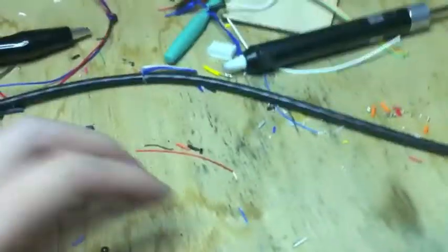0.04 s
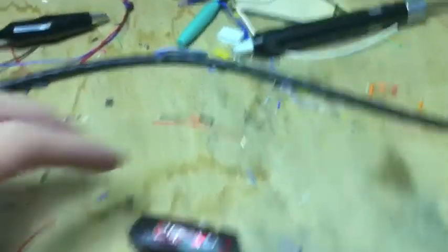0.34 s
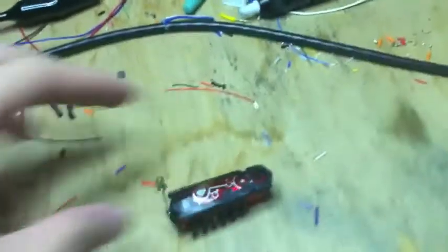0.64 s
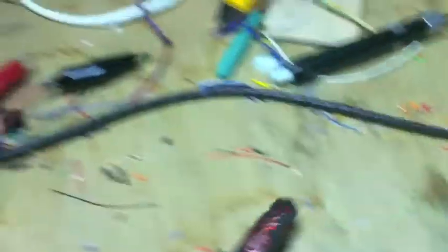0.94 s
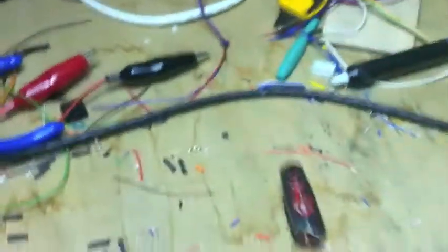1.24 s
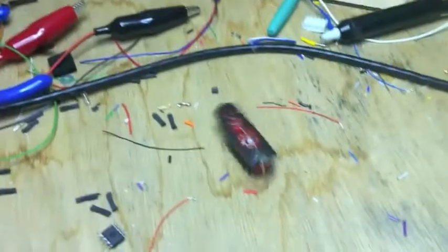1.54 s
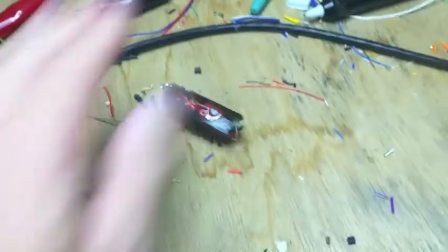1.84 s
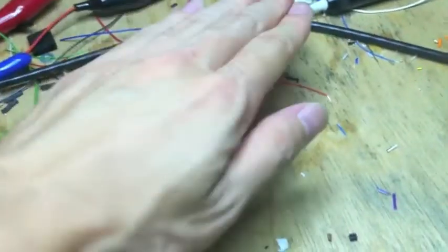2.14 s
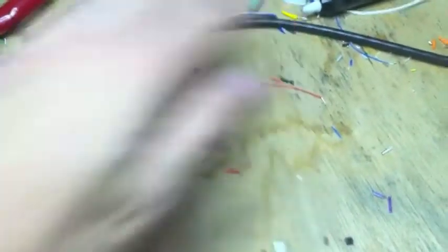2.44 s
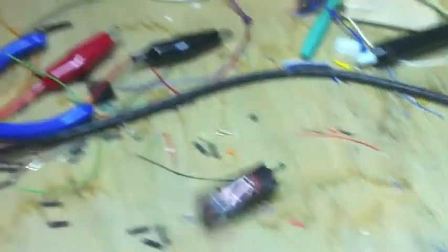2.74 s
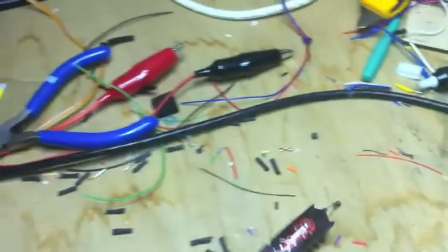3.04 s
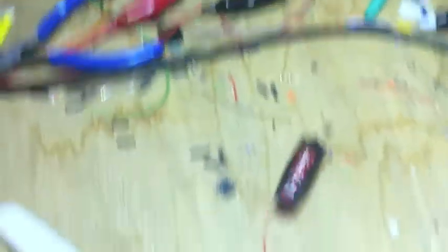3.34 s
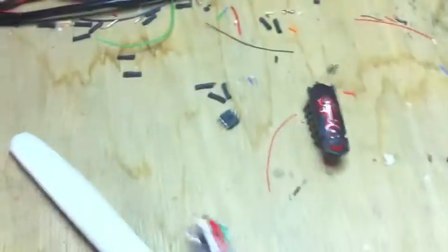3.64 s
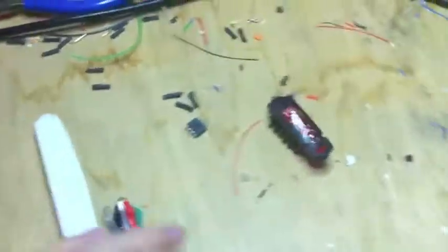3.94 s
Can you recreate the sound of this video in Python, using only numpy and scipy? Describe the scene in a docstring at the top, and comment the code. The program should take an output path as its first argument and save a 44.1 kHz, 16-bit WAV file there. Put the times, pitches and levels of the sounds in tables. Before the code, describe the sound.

A small vibrating toy bug skitters over a wooden workbench in quick, uneven plastic taps with a faint motor hum. It stops briefly, starts again, and a close scrape with knocks follows in a small, quiet room.

```python
"""Quick, uneven plastic taps skitter over a wooden workbench, above a faint hum and hiss.
It is a toy bug: a small unbalanced motor shakes it, so its shell keeps hitting the wood.
A hand holds it, lets go, covers it and lets go again. Near the end something is dragged
and knocked close by. The room is small and quiet."""
import sys
import numpy as np
from scipy import signal
from scipy.fft import rfft, irfft
from scipy.io import wavfile
from scipy.ndimage import uniform_filter1d

SR = 44100
rng = np.random.default_rng(int(sys.argv[2]) if len(sys.argv) > 2 else 0)


def store_wav(level_fs):
    """Save 16-bit WAV to argv[1]."""
    pcm = np.round(np.clip(np.atleast_2d(level_fs), -1, 1) * 32767)
    wavfile.write(sys.argv[1], SR, pcm.T.astype(np.int16))


N = 176400
T = np.arange(N) / SR
HIT_T = np.arange(int(.07 * SR)) / SR  # time within one hit, in seconds


def amp(db):
    """Turn decibels into a gain."""
    return 10 ** (np.asarray(db) / 20)


def unit(x):
    """Scale a signal to a typical size (rms) of 1."""
    return x / np.std(x)


def band(x, hz, kind="bandpass", order=2):
    """Keep the pitches between, above or below the given edges."""
    return signal.sosfilt(signal.butter(order, np.clip(hz, 10, SR * .45), kind, fs=SR, output="sos"), x)


def colour(x, points):
    """Shape the tone by (frequency [Hz], level [dB]) points; rms 1."""
    hz, db = np.array(points).T
    freqs = np.maximum(np.arange(N // 2 + 1) * SR / N, 1)
    gain = amp(np.interp(np.log(freqs), np.log(hz), db))
    return unit(irfft(rfft(x) * gain, N))


def curve(points):
    """A changing gain from (time [s], level [dB]) points."""
    return amp(np.interp(T, *np.array(points).T))


def wander(per_s):
    """A smooth random wobble with about per_s new values a second; rms 1."""
    hold = int(SR / per_s)
    steps = np.repeat(rng.standard_normal(N // hold + 1), hold)
    return unit(uniform_filter1d(uniform_filter1d(steps, hold), hold)[:N])


def add(out, at, sound):
    """Mix a sound in at a time in seconds."""
    start = int(np.clip(round(at * SR), 0, N - 1))
    out[start:start + len(sound)] += sound[:N - start]


def ring(modes, detune, scatter_db=3):
    """A struck object rings with a few dying tones, a little different on each blow."""
    hz, db, fade_s = np.array(modes).T
    chance = rng.standard_normal((2, len(hz)))
    db, hz = db + scatter_db * chance[0], hz * (1 + detune * chance[1])
    fades = np.exp(-np.log(1000) * HIT_T / fade_s[:, None])
    return amp(db) @ (np.sin(2 * np.pi * hz[:, None] * HIT_T) * fades)


def room_noise():
    """The soft, low, steady rush of a quiet room."""
    # tone of the rush (frequency [Hz], level [dB])
    tone = [(45, -27), (105, 0), (190, 3.5), (400, -10), (700, -17), (3000, -21.5), (15500, -25.5)]
    return amp(-65.5) * colour(rng.standard_normal(N), tone)


def clack(at, hardness):
    """One tap sets off the shell's broad resonances at once; harder contact is brighter."""
    # pitches the shell favours on wood (frequency [Hz], width [Hz], level [dB])
    resonances = [(1640, 320, -4.5), (2120, 524, -0.5), (3366, 710, -12.5), (4060, 594, -9),
                  (6500, 6000, -24.5)]
    # the lowest one swells and fades as the toy crosses the bench (time [s], boost [dB])
    woodiness = [(.75, 5.5), (1.0, -2), (1.4, 2), (2.3, -6.5), (3.4, 5)]
    hz, width, db = np.array(resonances).T
    chance = rng.standard_normal((2, len(db)))
    db, hz = db + 2.0 * chance[0], hz * (1 + 0.029 * chance[1])
    db[0] += np.interp(at, *np.array(woodiness).T)
    size = len(HIT_T)
    freqs = np.maximum(np.fft.rfftfreq(size, 1 / SR), 1)
    peaks = amp(db) / (1 + (2 * (freqs[:, None] - hz) / width) ** 2)
    treble_octaves = np.clip(np.log2(freqs / 2000), 0, 2)
    gain = np.linalg.norm(peaks, axis=1) * amp(0.22 * hardness * treble_octaves)
    # turn this tone shape into a tap with its energy at the very start (minimum phase)
    cepstrum = 2 * irfft(np.log(gain), size)[:size // 2]
    tap = irfft(np.exp(rfft(cepstrum, size)), size)
    return unit(band(tap, 1190, "highpass", order=3))


def shell_taps(chatter_s=0.0063, bench_delay_s=0.00291, bench_detune=0.057):
    """Each hop makes the shell clack and chatter and nudges the bench, which also takes dull bumps."""
    # the shell landing (time [s], relative level [dB], hardness [higher is brighter])
    hops = [(0.021, -41, 1.5), (0.514, -52, -14), (0.5407, -45.5, -10), (0.6172, -59, -3),
            (0.644, -54, -20), (0.6737, -44, -8), (0.7006, -42, -18), (0.7307, -41.5, 13),
            (0.7593, -43.5, -4), (0.786, -57, -30), (0.8415, -49, -33), (0.877, -55, -28),
            (0.905, -42.5, -11), (0.927, -43, 2.5), (0.946, -44.5, -1), (0.967, -49.5, -7), (0.986, -47, 1),
            (1.002, -44.5, 1), (1.0204, -48.5, -10), (1.033, -45.5, -3), (1.0622, -45.5, -4),
            (1.0982, -49, -28), (1.1285, -42.5, 7.5), (1.166, -42.5, 15), (1.199, -47.5, 0),
            (1.2354, -53.5, 0), (1.2654, -51.5, -5), (1.3399, -45, -36), (1.366, -45, -11),
            (1.471, -41, 6.5), (1.4972, -43, -12), (1.519, -49.5, 7), (1.559, -44.5, -3), (1.6029, -42, 5),
            (1.6489, -47, 1), (1.72, -43, -6), (1.7774, -44.5, -4.5), (1.817, -46, -9), (1.851, -50.5, 4),
            (1.883, -42, -2), (1.921, -50.5, -3), (1.9686, -39.5, -1.5), (1.9953, -45.5, -12),
            (2.0042, -48, -9), (2.0287, -44, -12), (2.058, -40, 5.5), (2.114, -47, -19), (2.1796, -57, -36),
            (2.1949, -60, -31), (2.6593, -47.5, -16), (2.686, -43.5, 5.5), (2.722, -50, -6),
            (2.753, -46, 0), (2.7636, -51.5, -2), (2.7961, -44, -3.5), (2.833, -42.5, -1),
            (2.867, -36, -11), (2.8944, -48.5, -18), (2.924, -52.5, -49), (2.9685, -46, 0),
            (3.0023, -50, 6), (3.0286, -42.5, -2), (3.0898, -53.5, -13), (3.1267, -46, -5.5),
            (3.199, -49.5, -16), (3.231, -50, 0), (3.2442, -49.5, 6), (3.2696, -53, -7),
            (3.3056, -44.5, 2.5), (3.3157, -51, -17), (3.3766, -44.5, -20), (3.3943, -50, -15),
            (3.4083, -46.5, 0), (3.4298, -56, -1), (3.4453, -48, 2), (3.477, -49.5, -44),
            (3.5021, -46, 1.5), (3.5399, -49.5, -2), (3.564, -48, -18), (3.582, -46.5, 5.5),
            (3.6067, -46, 3), (3.6284, -48, -6), (3.6563, -46, -4), (3.6826, -44, 4), (3.9557, -47.5, 4),
            (3.9688, -48.5, -22)]
    # tones of the bench top (frequency [Hz], level [dB], time to fade by 60 dB [s])
    bench_modes = [(199, -6.5, 0.094), (299, -5, 0.044), (398.6, -1, 0.056), (960, -7.5, 0.013)]
    # dull bumps on the bench (time [s], level [dB])
    bumps = [(0.044, -46.5), (1.408, -46), (1.426, -47.5), (1.647, -48)]
    shell, chatter, bench = np.zeros((3, N))
    for at, db, hardness in hops:
        add(shell, at, amp(db - 9.5) * clack(at, hardness))
        puff = rng.standard_normal(len(HIT_T)) * np.exp(-(HIT_T / chatter_s) ** 2)
        add(chatter, at, amp(db - 4 + 0.63 * hardness) * puff)
        add(bench, at + bench_delay_s, amp(db - 13) * ring(bench_modes, bench_detune))
    for at, db in bumps:
        add(bench, at, amp(db) * ring(bench_modes, bench_detune))
    chatter = band(band(chatter, 3520, "highpass"), 10000, "lowpass", order=1)
    return shell + chatter + band(bench, 131, "highpass")


def knocks(click_decay_s=0.0066):
    """Handling makes hollow knocks: a short ring with a click on top."""
    # the knocks (time [s], ring level [dB], click level [dB])
    blows = [(0.0496, -45, -50), (0.071, -45.5, -50), (0.107, -50, -51.5), (2.862, -51, -45),
             (2.8647, -42, -32), (3.6366, -34, -51), (3.7211, -34, -28), (3.7241, -42, -31),
             (3.737, -35, -49), (3.7472, -29.5, -60), (3.8332, -37.5, -40), (3.8548, -37, -40.5),
             (3.9299, -39.5, -60)]
    # tones of a knock (frequency [Hz], level [dB], time to fade by 60 dB [s])
    knock_modes = [(1023, -9, 0.019), (1460, -3, 0.0066), (1560, 1.5, 0.013)]
    body, click = np.zeros((2, N))
    for at, body_db, click_db in blows:
        add(body, at, amp(body_db) * ring(knock_modes, detune=0.089))
        puff = rng.standard_normal(len(HIT_T)) * np.exp(-HIT_T / click_decay_s)
        add(click, at, amp(click_db) * puff)
    return band(body, 850, "highpass") + band(click, (1920, 5750), order=1)


def motor(spin_hz=188.3, ticks_per_s=110, fade_s=0.2):
    """The spinning weight hums, the brushes hiss, the legs tick and shake the bench."""
    # the toy running free (start [s], end [s], hum [dB], hiss [dB], rumble [dB], leg ticks [dB])
    runs = [(.5, 2.174, -67.5, -73, -64.8, -73.5), (2.66, 4.05, -66, -74, -67.5, -69)]
    # tone of the shaking bench (frequency [Hz], level [dB])
    rumble_tone = [(50, -14), (130, -8), (280, 5), (430, -1), (650, -12), (6000, -24)]
    phase = 2 * np.pi * np.cumsum(spin_hz * (1 + .04 * wander(22))) / SR
    hum = np.sin(phase) + amp(-7) * np.sin(2 * phase)
    hum = unit(hum * amp(3.1 * wander(14)))
    hiss = unit(band(rng.standard_normal(N), (7445, 7835), order=1) * amp(wander(9.82)))
    rumble = colour(rng.standard_normal(N), rumble_tone) * amp(2 * wander(13))
    steps = (rng.random(N) < ticks_per_s / SR) * amp(11 * rng.uniform(-1, 1, N))
    legs = unit(signal.fftconvolve(steps, clack(at=0, hardness=-21))[:N])
    out = np.zeros(N)
    for start, end, hum_db, hiss_db, rumble_db, legs_db in runs:
        # fades in as the hand lets go, out as it covers the toy
        free = np.clip(np.minimum(T - start, end - T) / fade_s + .5, 0, 1)
        layers = amp(hum_db) * hum + amp(hiss_db) * hiss + amp(rumble_db) * rumble + amp(legs_db) * legs
        out += free * layers
    return out


def rustle():
    """A faint scratchy rustle: high noise that flickers quickly."""
    # loudness of the rustle (time [s], level [dB])
    levels = [(2.6, -85.5), (3.27, -59.5), (3.5, -69.5), (4.0, -75)]
    scratches = rng.standard_normal(N) * wander(160) ** 2
    return unit(band(scratches, 2400, "highpass", order=1)) * curve(levels)


def dragging(slips_per_s=72, slip_decay_s=0.003):
    """Something sticks and slips in quick rough jerks, ending in a rising rub."""
    # loudness as the pressure changes (time [s], level [dB])
    levels = [(3.62, -90), (3.688, -61), (3.704, -40.5), (3.735, -41.5), (3.765, -50), (3.81, -50),
              (3.84, -44), (3.875, -52.5), (3.925, -48.5), (4.0, -73)]
    # tone of the scrape (frequency [Hz], level [dB])
    tone = [(60, -17), (170, -0.5), (370, 6.5), (750, 0), (1150, -4), (1590, 1.5), (2200, -4.5),
            (4600, -11), (15000, -20)]
    # start and end of the rub (time [s], pitch [Hz])
    glide = [(3.82, 428.7), (3.93, 977)]
    slip_count = np.cumsum(slips_per_s * (1 + 0.02 * wander(40))) / SR
    since_slip_s = (slip_count % 1) / slips_per_s
    friction = 0.43 + np.exp(-since_slip_s / slip_decay_s)
    jerks = amp(19.5) * np.diff(np.floor(slip_count), prepend=0)  # one spike per slip
    grit = rng.standard_normal(N) * friction + jerks
    scrape = colour(grit * amp(2 * wander(slips_per_s * 2)), tone)
    times, hz = np.array(glide).T
    swell = np.sin(np.pi * np.interp(T, times, [0, 1]))
    rub_phase = 2 * np.pi * np.cumsum(np.interp(T, times, hz)) / SR
    rub = swell * wander(230) * np.sin(rub_phase)  # the fast wobble roughens the tone
    return scrape * curve(levels) + amp(-52) * rub


def room_echo(x, early_decay_s=0.003, tail_s=.22):
    """Add quick reflections from the clutter on the bench, then a short faint tail."""
    t = T[:SR // 2]
    early, late = rng.standard_normal((2, len(t)))
    early = early * np.exp(-t / early_decay_s) * (t > .0018)
    late = late * np.exp(-np.log(1000) * t / tail_s) * (t > .008)
    echoes = amp(-7) * early / np.linalg.norm(early) + amp(-15.5) * late / np.linalg.norm(late)
    return x + signal.fftconvolve(x, echoes)[:N]


def scene():
    """Mix the toy, the handling and the room into one channel."""
    air = room_noise()
    contacts = shell_taps() + knocks() + dragging() + rustle()
    return (room_echo(contacts) + motor() + air)[None]


def record(dry, top_hz=15900):
    """Cut away the very highest treble."""
    return signal.sosfilt(signal.ellip(10, .2, 70, top_hz, fs=SR, output="sos"), dry)


dry = scene()
out = record(dry)
store_wav(out)
```